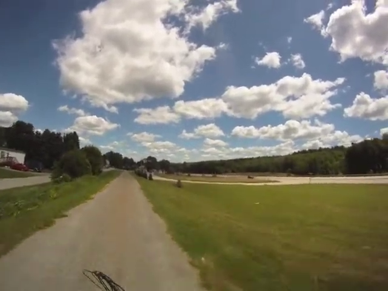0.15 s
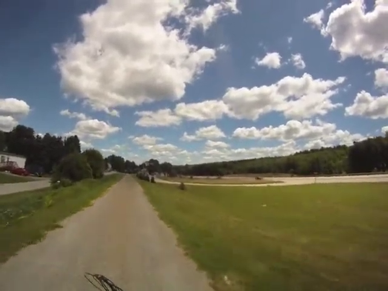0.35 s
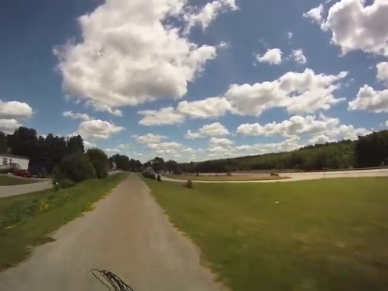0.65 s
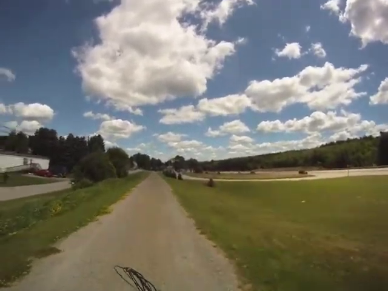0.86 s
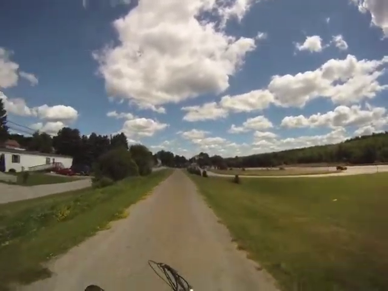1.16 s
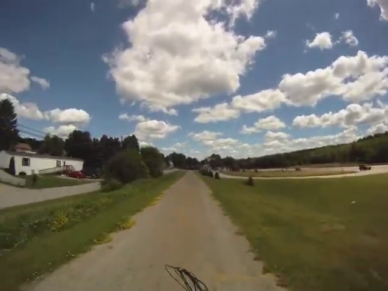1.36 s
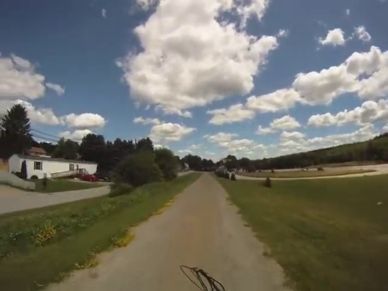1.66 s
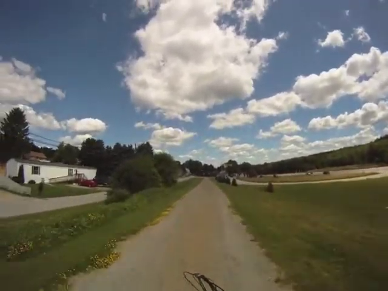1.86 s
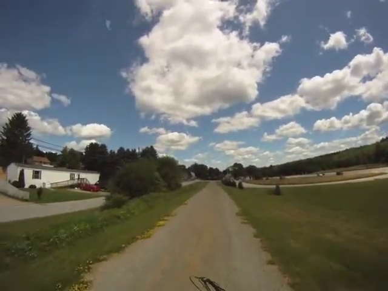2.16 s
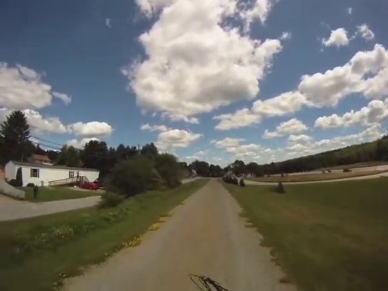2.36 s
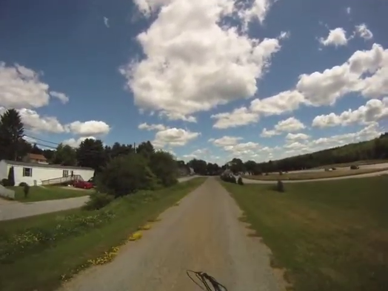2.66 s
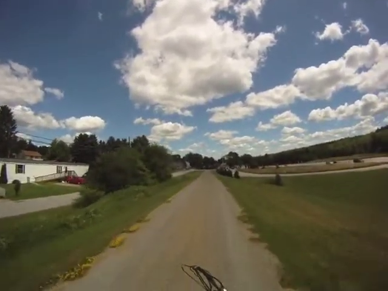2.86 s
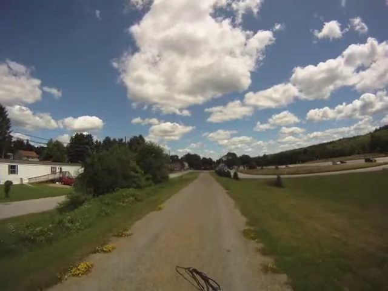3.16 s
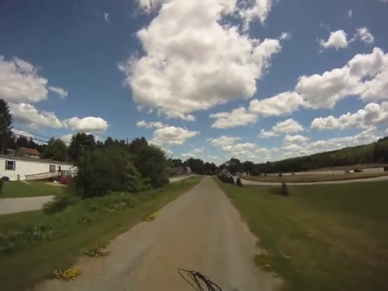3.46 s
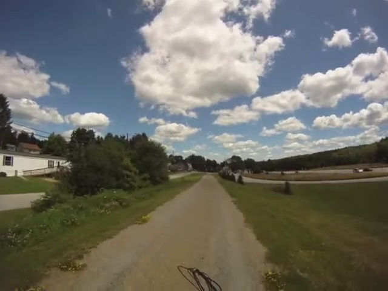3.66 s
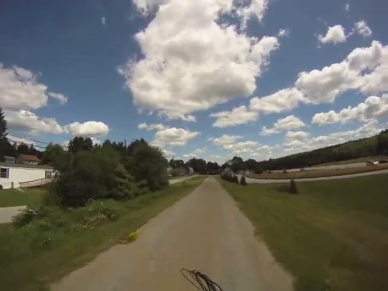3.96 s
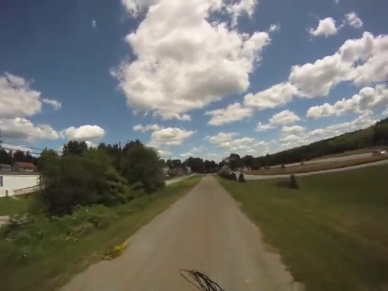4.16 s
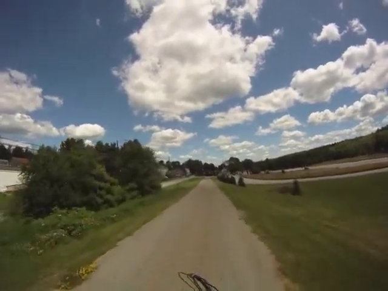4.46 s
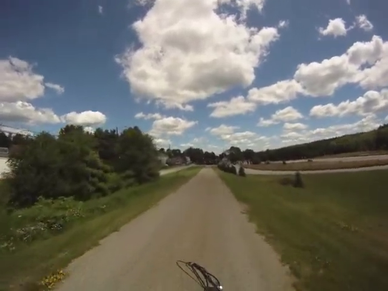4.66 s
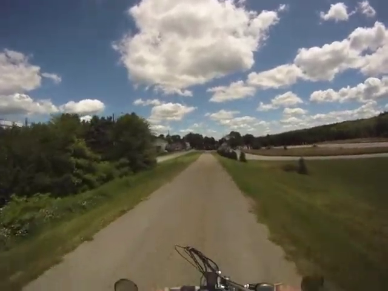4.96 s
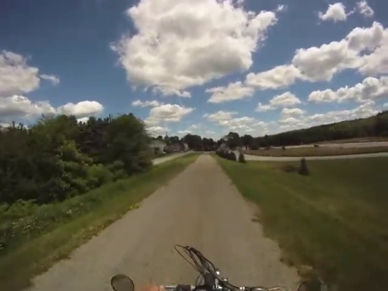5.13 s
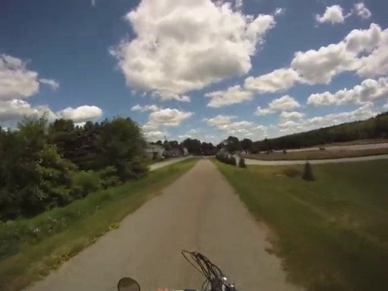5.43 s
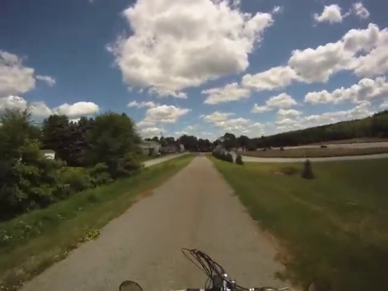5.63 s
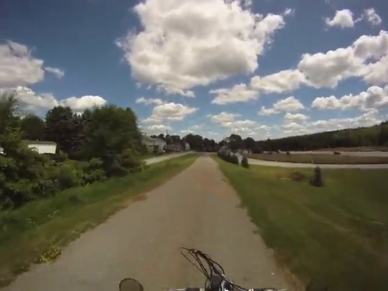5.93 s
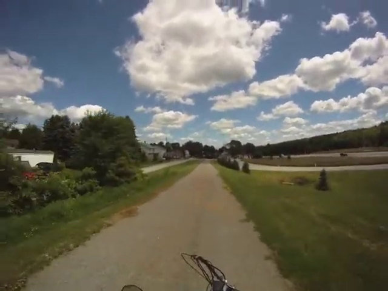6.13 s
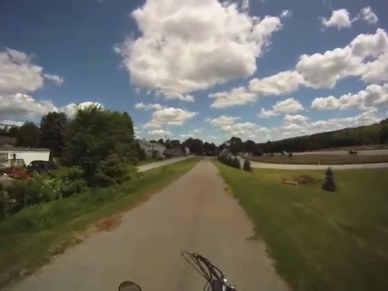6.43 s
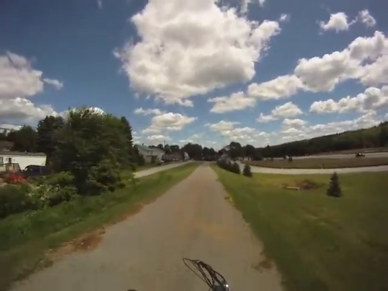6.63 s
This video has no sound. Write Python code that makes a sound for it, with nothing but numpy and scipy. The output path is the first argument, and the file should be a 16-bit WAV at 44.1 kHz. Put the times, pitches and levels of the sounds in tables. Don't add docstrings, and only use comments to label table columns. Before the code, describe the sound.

Tyres grind and rumble over gravel with sharp pebble knocks and wind buffeting, as a deep slow engine draws near and then sinks slightly.

```python
import sys
import numpy as np
from scipy import signal
from scipy.fft import rfft, irfft
from scipy.io import wavfile
from scipy.ndimage import uniform_filter1d

SR = 44100
rng = np.random.default_rng(int(sys.argv[2]) if len(sys.argv) > 2 else 0)


def magnitude_from_level(level_db):
    exponent = np.asarray(level_db, float) / 20
    return 10 ** exponent


def log_audio(samples):
    frames = np.atleast_2d(samples).T
    limited = np.clip(frames, -1, 1)
    pcm = np.round(limited * 32767).astype(np.int16)
    wavfile.write(sys.argv[1], SR, pcm)


N = 299439
CUT_S, CUT_FADE_S = 5.77, 0.011


def rms_one(x):
    return x / np.sqrt(np.mean(x ** 2) + 1e-20)


def in_time(rows):
    s, *columns = np.transpose(rows)
    return [np.interp(np.arange(N) / SR, s, column) for column in columns]


def after_cut():
    return np.clip((np.arange(N) / SR - CUT_S) / CUT_FADE_S + 0.5, 0, 1)


def drift(rate):
    r = np.exp(-80 * np.pi * rate / SR)
    noise = rng.standard_normal(N // 40 + 2002)
    slow = signal.lfilter([1], [1, -2 * r, r * r], noise)[2000:]
    return np.interp(np.arange(N) / 40, np.arange(len(slow)), rms_one(slow))


def coloured(x, spectrum):
    hz, level_db = np.transpose(spectrum)
    log_hz = np.log(np.fft.rfftfreq(N, 1 / SR) + 1)
    gain = magnitude_from_level(np.interp(log_hz, np.log(hz), level_db, left=-80, right=-80))
    return rms_one(irfft(rfft(x) * gain, N))


def grains(per_s, spread_db):
    sizes = magnitude_from_level(spread_db * np.minimum(rng.exponential(1, N), 5)) * rng.choice([-1, 1], N)
    return sizes * (rng.random(N) < per_s / SR)


def body(contacts, peaks, patchy_db):
    out = 0
    for k, (hz, width, level_db) in enumerate(peaks):
        r = np.exp(-np.pi * width / SR)
        poles = [1, -2 * r * np.cos(2 * np.pi * hz / SR), r * r]
        ring = signal.lfilter([(1 - r * r) / 2, 0, -(1 - r * r) / 2], poles, contacts)
        out = out + (-1) ** k * magnitude_from_level(level_db + patchy_db * drift(11.2)) * ring
    return rms_one(out)


# time in seconds, crunch level in dB.
PACE = [(0, -57), (.5, -57.5), (.95, -55.5), (1.6, -55.5), (2.3, -55), (2.75, -54), (3.25, -54.5),
        (3.7, -53), (4.5, -52), (5.0, -48.5), (5.5, -49.5), (6.2, -53), (6.4, -48.5), (6.62, -52.5),
        (6.79, -48.5)]


def pace():
    crunch_db = in_time(PACE)[0]
    return crunch_db, crunch_db + 54


# pitch in Hz, width in Hz, level in dB.
CRUNCH = [(1185, 540, 0), (1693, 466, 2), (2207, 330, -2.5), (2923, 507, -3), (3468, 700, -18)]
# frequency in Hz, level in dB per Hz.
GRIT = [(1940, -39), (3300, -21), (3550, 3.5), (3890, 7), (4250, 0), (5160, 3), (5430, -1), (6000, -19)]
# pitch in Hz, width in Hz, level in dB.
PEBBLES = [(644, 160, -4), (1670, 150, 16), (2880, 500, -21)]


def gravel():
    t = np.arange(N) / SR
    crunch_db, swing_db = pace()
    grit_db = -78.5 + 1.5 * t + 0.28 * swing_db + 2.1 * drift(1.3)
    crushed = rms_one(grains(6000, 1.14)) * magnitude_from_level(0.42 * drift(26))
    crushed += magnitude_from_level(14.5) * np.convolve(grains(30, 1.9), [0.97, 1.0, -0.5, -0.39], "same")
    crunch = magnitude_from_level(crunch_db - 0.12) * body(crushed, CRUNCH, patchy_db=0.6)
    grit = magnitude_from_level(grit_db + 3.0 + 0.25 * drift(11)) * coloured(crushed, GRIT)
    pebbles = magnitude_from_level(crunch_db - 19.5) * body(grains(120, 0.72), PEBBLES, patchy_db=9.0)
    return crunch + grit + pebbles


# start in seconds, length in seconds, gain in dB.
FIRM = [
    (2.196, 0.83, 3),
    (3.325, 0.82, 3),
    (4.306, .8, 2),
    (5.695, 0.42, 3),
]
# pitch in Hz, width in Hz, level in dB.
ROAR = [(289, 78, -5.5), (481, 93, -0.5), (606, 131, 0), (915, 240, -3.5)]
# pitch in Hz, width in Hz, level in dB.
DRUM = [(534, 48, -4), (624, 48, -3.5), (835, 78, -12.5)]
# frequency in Hz, level in dB per Hz.
RUMBLE = [(26, -33), (45, -11.5), (138, -3), (225, -7.5), (420, -26), (550, -56), (920, -120)]


def tyres():
    t, edge_s = np.arange(N) / SR, 0.24
    firm_db = 0
    for start, length, gain_db in FIRM:
        inside_s = np.minimum(t - start, start + length - t)
        firm_db = firm_db + gain_db * np.clip(inside_s / edge_s + 0.5, 0, 1)
    roar_db = -53.5 + 0.93 * pace()[1] + firm_db + 0.69 * drift(7.1)
    roar = magnitude_from_level(roar_db + 1.0) * body(grains(4000, 1.34), ROAR, patchy_db=0.79)
    drum = magnitude_from_level(roar_db - 14 + 3.15 * firm_db) * body(grains(2000, 2.8), DRUM, patchy_db=4.5)
    rumble_db = uniform_filter1d(roar_db, size=20000) + 2.0 + 0.28 * drift(5.4)
    rumble = magnitude_from_level(rumble_db) * coloured(rng.standard_normal(N), RUMBLE)
    return roar + drum + rumble


# time in seconds, peak in dB, pitch in Hz, rattle in dB against the snap.
STONES = [(0.138, -37, 2000, -24), (0.1466, -40, 1960, -27), (0.2455, -52, 1830, -14),
          (0.2808, -34.5, 2690, -16), (0.392, -34, 2700, -11), (0.691, -22.5, 2140, -12.5),
          (0.726, -37, 2360, -11), (0.9138, -37.5, 1780, -4), (0.9538, -37.5, 2080, -9),
          (1.407, -44.5, 2880, -3), (1.5013, -29, 3000, -13), (1.5765, -35, 2600, -13),
          (1.716, -40, 2820, -8), (1.776, -34.5, 2480, -15), (1.7972, -40, 1720, -18),
          (1.9393, -37, 1750, -16), (2.005, -37, 2710, -20), (2.047, -37, 2160, -12),
          (2.0868, -37, 2100, -28), (2.4588, -39, 1920, -19), (2.5092, -32, 900, -25),
          (2.5336, -26.5, 2400, -15), (2.5757, -37, 2600, -21), (2.818, -37, 1850, -13),
          (2.9666, -37, 2820, -14), (2.9975, -38, 2850, -15), (4.0012, -29, 2830, -18),
          (4.601, -37, 1706, -14), (6.34, -40.5, 1700, -1), (6.75, -43, 1960, 0)]
# pitch in Hz, width in Hz, level in dB.
RATTLE = [(2010, 1600, 11), (3270, 530, 18), (4500, 1800, -26)]


def stones():
    out, t = np.zeros(N), np.arange(1600) / SR
    rattles = body(rng.standard_normal(N), RATTLE, patchy_db=1.5)
    for s, peak_db, hz, rattle_db in STONES:
        at = round((s + 0.0006) * SR)
        contact_s = 0.00019 * (1 + 0.025 * (-29 - peak_db))
        push = 1.7 * (t / contact_s) ** 2 * np.exp(-t / contact_s)
        snap = np.sin(2 * np.pi * hz * t) * push
        rattle = magnitude_from_level(rattle_db - 60 * t / 0.036) * rattles[at:at + len(t)] * (1 - np.exp(-t / 0.00072))
        crack_db = -9.5 + 0.5 * (peak_db + 34)
        edge = (t * 2.27 / 0.00044) * np.exp(-t / 0.00031)
        crack = magnitude_from_level(crack_db) * np.sin(2 * np.pi * 3900 * t) * edge
        thud_db = -67 - peak_db + 0.98 * (peak_db + 39)
        thud = magnitude_from_level(thud_db - 60 * t / 0.065) * np.sin(2 * np.pi * 520 * t)
        out[at:at + len(t)] += magnitude_from_level(peak_db - 3.8) * (snap + crack + rattle + thud)
    return out


# time in seconds, peak in dB, pitch in Hz.
TICKS = [(0.206, -74, 5010), (0.469, -59.5, 4950), (1.0006, -66, 5460), (1.4356, -71, 4970),
         (1.4735, -71, 4930), (1.637, -69, 5270), (3.147, -55, 5080), (3.5877, -68, 4910),
         (3.7758, -64, 5020), (3.8927, -64, 5484), (3.933, -60, 5200), (4.2383, -63, 5185),
         (4.296, -61, 4910), (5.639, -65, 5170), (6.4093, -55.5, 5070), (6.5134, -59, 5200)]
# first link in seconds, number of links, peak in dB.
BRUSHES = [
    (1.849, 2, -69),
    (1.954, 8, -63.5),
    (2.578, 8, -65),
    (3.208, 4, -64.5),
]
# frequency in Hz, level in dB per Hz.
SCRAPE = [(4300, -21), (4900, 17), (5600, -15), (6100, 2)]


def chain():
    out, t = np.zeros(N), np.arange(1500) / SR
    link_s, jitter_s, spread_db, tick_s = 0.0526, 0.003, -2.5, 0.0105
    low_hz, high_hz = 5000, 5980
    scrape = coloured(rng.standard_normal(N), SCRAPE)
    pings = [tuple(row) for row in TICKS]
    for first_s, count, peak_db in BRUSHES:
        for k in range(round(count)):
            a, b, c = rng.random(3)
            s = first_s + k * link_s + jitter_s * (2 * a - 1)
            pings.append((s, peak_db + spread_db * (2 * b - 1), low_hz + (high_hz - low_hz) * c))
    for s, peak_db, hz in pings:
        at = round(s * SR)
        swell = np.sin(np.pi * np.clip(t / tick_s, 0, 1) ** 0.5) ** 2
        note = np.sin(2 * np.pi * hz * t) + magnitude_from_level(1.0) * scrape[at:at + len(t)]
        out[at:at + len(t)] += magnitude_from_level(peak_db - 2.5) * swell * note
    fine = np.convolve(np.abs(grains(32, 2.6)), magnitude_from_level(-60 * t / 0.011))[:N]
    return out + magnitude_from_level(-86) * fine * scrape


# time in seconds, level in dB.
NEAR = [(0, -53.5), (1.0, -56.5), (1.9, -49), (2.6, -46.5), (3.5, -44), (4.3, -41), (5.0, -35),
        (5.7, -34.5), (6.2, -36), (6.79, -37.5)]
# time in seconds, firing cycle in Hz.
CYCLE = [(0, 44.9), (1, 44.6), (2, 44.25), (3, 44.0), (3.8, 43.65), (4.2, 43.36), (4.8, 42.83),
         (5.1, 42.22), (5.35, 41.91), (5.55, 41.47), (5.76, 41.42), (5.79, 42.41), (5.95, 42.09),
         (6.1, 41.95), (6.25, 41.47), (6.55, 40.68), (6.79, 40.56)]
# multiple of the cycle, dB against nearness, share of its swing,
# step in dB once the scene changes.
ORDERS_DB = [(2, -2, 0.78, 5), (3, 0.5, 0.91, 1.5), (4, -10, 1.52, -3.5), (5, -21, 1.13, 3)]
# multiple of the cycle, multiple it follows, dB against that one.
FAINT_ORDERS = [(1, 5, -41), (6, 5, -6.5), (7, 4, -19), (8, 5, -28)]
# time in seconds, multiple,
# change in dB, half width in seconds.
FADES = [(0.17, 2, 8.5, 0.046), (0.18, 3, 6.5, 0.038), (1.47, 3, 4, 0.017), (2.42, 2, -15, .07),
         (2.4, 3, -8.5, 0.06), (2.87, 3, -15, 0.096), (3.06, 2, -23, 0.034), (3.41, 2, -9, .08),
         (4.5, 2, -4, 0.11), (4.9, 2, -6, 0.14), (5.98, 4, -16, 0.24), (6.41, 2, -8, 0.13),
         (4.6, 5, -13, 0.46), (10, 5, 8, .1), (6.4, 5, 2, 0.24), (4.54, 4, 3, 0.3), (7.9, 5, 3, 0.31),
         (1.05, 3, 4.5, 0.16)]
# time in seconds, phase bend in rad.
SMEAR = [(0, -3.2), (4.5, -3.2), (5.0, -2.1), (6.2, -2.2), (6.7, -.3)]


def engine():
    t, middle_db = np.arange(N) / SR, -44
    swing_db = in_time(NEAR)[0] - middle_db
    past = after_cut()
    flutter_db = 2.8 * (1 - 0.9 * np.clip(swing_db / 20 + 0.5, 0, 1))
    orders = {}
    for k, db, share, step_db in ORDERS_DB:
        orders[round(k)] = middle_db + db + share * swing_db + step_db * past + flutter_db * drift(6.0)
    for s, k, db, half in FADES:
        orders[round(k)] = orders[round(k)] + db * np.exp(-((t - s) / half) ** 2)
    orders.update({round(k): orders[round(lead)] + db for k, lead, db in FAINT_ORDERS})
    phase = 2 * np.pi * np.cumsum(in_time(CYCLE)[0]) / SR
    bend = in_time(SMEAR)[0]
    out = 0
    for k, db in orders.items():
        shift = bend * ((k - 3) ** 2 + 3 - k) / 2 + 0.08 * drift(5)
        out = out + np.sqrt(2) * magnitude_from_level(db + 0.5 * drift(33)) * np.cos(k * phase + shift)
    return out


# time in seconds, level in dB.
BREEZE = [(0, -46), (1.0, -50), (1.7, -49), (2.4, -52), (3.4, -52), (4.5, -52.5), (5.1, -41), (5.6, -42),
          (6.2, -52), (6.52, -44), (6.79, -48)]
# frequency in Hz, level in dB per Hz.
WIND = [(8.8, -31), (15, -1), (32, -8), (59, -3.5), (70, 1), (91, -12), (150, -120)]


def wind():
    wind_db = in_time(BREEZE)[0] + 0.5 * drift(2.0)
    return magnitude_from_level(wind_db - 0.8) * coloured(rng.standard_normal(N), WIND)


def scene():
    housing = signal.butter(6, 5400, fs=SR, output="sos")
    edges = np.clip(np.minimum(np.arange(N), N - np.arange(N)) / 60, 0, 1)
    ride = gravel() + tyres() + stones() + engine() + wind()
    return (edges * (signal.sosfilt(housing, edges * ride) + chain()))[None]


def sample_and_hold(x, rate):
    t, hz = np.arange(N) / SR, np.fft.rfftfreq(N, 1 / SR)
    band = irfft(rfft(x) * (hz < rate / 2), N)
    sampled = band * (1 + 2 * np.cos(2 * np.pi * rate * t))
    hold = np.sinc(hz / rate) / np.sinc(hz / rate / 4)
    return irfft(rfft(sampled) * hold * magnitude_from_level(-0.3 * (hz / rate) ** 2), N)


def roll_off(x):
    return signal.sosfilt(signal.butter(12, 15800, fs=SR, output="sos"), x)


SAMPLING_HZ = 12000, 12375
# hiss ahead of the converter in dB, hiss behind it in dB.
HISS_DB = (-92, -105), (-70.5, -77)
# frequency in Hz, level in dB per Hz.
HISS = [(2000, -29), (4000, -4), (5600, -1), (6150, -6)]


def record(dry):
    late = after_cut()
    out, hiss = 0, coloured(rng.standard_normal(N), HISS)
    for rate, share, (hiss_db, grain_db) in zip(SAMPLING_HZ, (1 - late, late), HISS_DB):
        held = sample_and_hold(dry + magnitude_from_level(hiss_db) * hiss, rate)
        out = out + share * (held + magnitude_from_level(grain_db) * rng.standard_normal(N))
    clock_hiss = body(rng.standard_normal(N), [(SAMPLING_HZ[1], 900, 0)], patchy_db=1.5)
    out += late * magnitude_from_level(-83) * clock_hiss
    top_hz = 15300
    out = irfft(rfft(out) * (np.fft.rfftfreq(N, 1 / SR) < top_hz), N)
    return roll_off(out)


dry = scene()
out = record(dry)
log_audio(out)
```